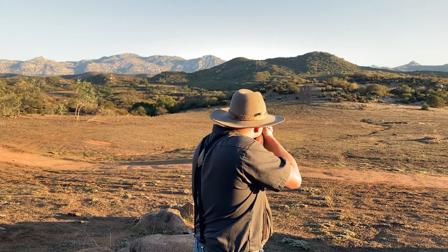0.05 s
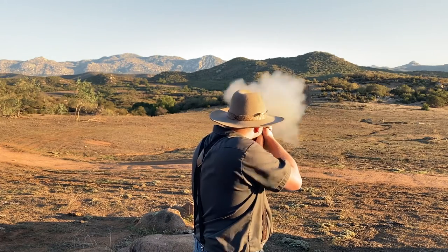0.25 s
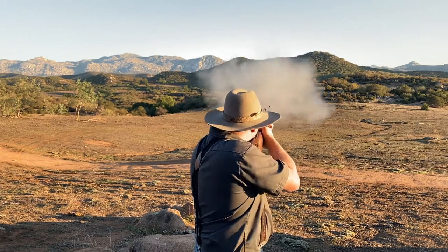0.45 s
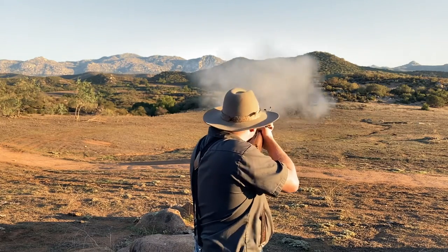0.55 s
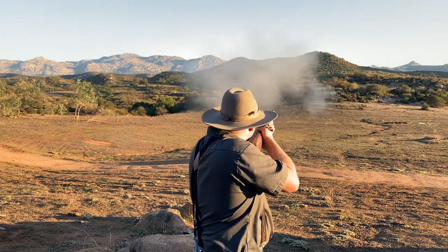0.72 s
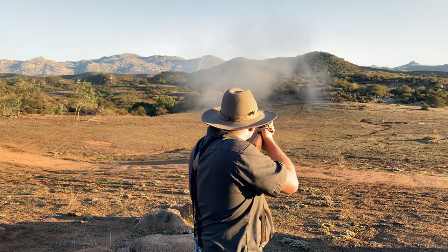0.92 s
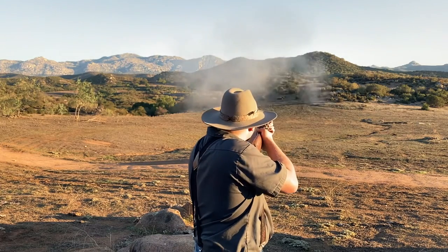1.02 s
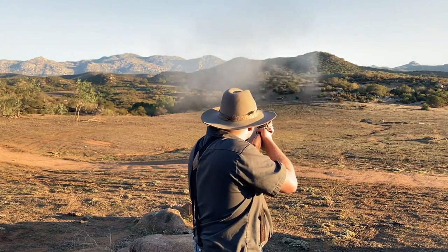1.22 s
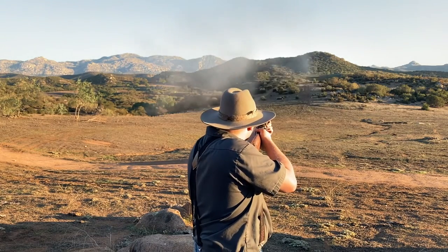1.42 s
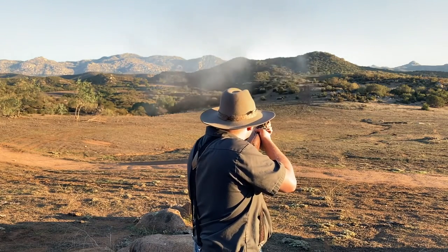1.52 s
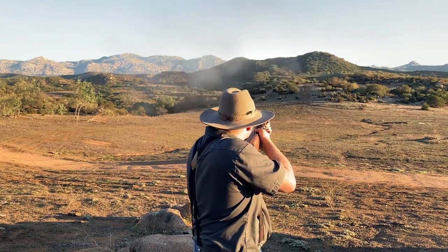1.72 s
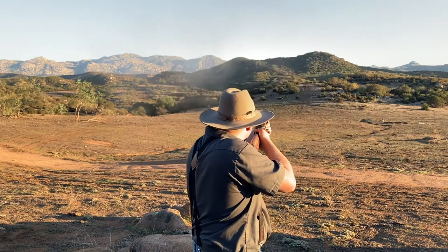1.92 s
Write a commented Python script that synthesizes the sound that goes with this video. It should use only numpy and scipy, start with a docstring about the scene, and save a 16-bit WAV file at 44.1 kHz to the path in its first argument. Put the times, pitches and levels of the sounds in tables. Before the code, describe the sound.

On open dry scrubland, one nearby rifle fires with a sharp, slightly overloaded blast; scattered echoes and low bass waves fade over a second and a half, then a far metal target clinks softly.

```python
"""A rifle shot close by on open scrubland: a faint swell of noise, a blast in several fronts, a deep thump.
Bushes, a slope and far hills send it back ever duller; late, a distant steel plate rings under the bullet.
A low outdoor rumble lies under all. Shaped noise makes the lead-in, fronts, roar, echoes and rumble;
sines that die away make the first tick, the pressure swings, the thump and the notes of the steel."""
import sys
import numpy as np
from scipy import signal
from scipy.fft import rfft, irfft, next_fast_len
from scipy.io import wavfile
from scipy.ndimage import uniform_filter1d, map_coordinates

SR = 44100
rng = np.random.default_rng(int(sys.argv[2]) if len(sys.argv) > 2 else 0)


def attenuation_scalar(level_db):
    """Turn a level in dB into a linear amplitude multiplier (20 dB per decade)."""
    decades = np.asarray(level_db, float) / 20
    return 10 ** decades


def output_pcm(signal):
    """Save a mono or channel-first signal as 16-bit PCM at the path in sys.argv[1].

    Samples are clipped to [-1, 1] before scaling.
    """
    pcm = np.clip(np.atleast_2d(signal).T, -1, 1) * 32767
    wavfile.write(sys.argv[1], SR, np.round(pcm).astype(np.int16))


N = 85995

# In every noise colour below, the levels only matter relative to each other.
# Shock fronts, bursts of bright noise: (t/s, level/dB before doubling, length/s, left over right/dB)
SHOCK_FRONTS = [(.2190, -9, .0012, -2), (.2240, -15, .0015, -1), (.2272, -9, .0025, -2),
                (.2322, -9, .0018, -1), (.2366, -14, .002, 0)]
# How alike left and right are for wide, outdoor sounds: (f/Hz, likeness from 0 to 1)
WIDE = [(50, 0.9), (200, .9), (1000, .7), (4000, .6), (12000, .3)]
# The same for the blast and other short, sharp sounds: (f/Hz, likeness from 0 to 1)
COMPACT = [(50, 1), (1000, .8), (8000, .3), (12000, 0.13)]
LEFT_LEADS_S = .0004  # the left channel of some echoes comes this much earlier


def unit(x):
    """Scales a signal to rms 1."""
    return x / np.sqrt(np.mean(x ** 2) + 1e-20)


def along(points, hz):
    """Reads a curve of (f/Hz, value) points along a log pitch axis."""
    f, v = np.transpose(points)
    return np.interp(np.log(hz + 1), np.log(f + 1), v)


def level(rows):
    """Gain per sample from (t/s, level/dB) rows, practically silent before the first."""
    s, db = np.transpose(rows)
    return attenuation_scalar(np.interp(np.arange(N) / SR, s, db, left=-150))


def pan(db):
    """Left and right gains that differ by db."""
    return attenuation_scalar(np.array([[db / 2], [-db / 2]]))


def fade_in(at_s, over_s):
    """A smooth step from 0 to 1, half way up at at_s."""
    return (1 + np.tanh((np.arange(N) / SR - at_s) / over_s / 2)) / 2


def decay(start_s, t60, rise_s):
    """Seconds since a start, and an envelope that rises, then falls by 60 dB in each t60 seconds."""
    t = np.maximum(np.arange(N) / SR - start_s, 0)
    return t, attenuation_scalar(-60 * t / t60) * (1 - np.exp(-t / rise_s))


def ring(start_s, db, hz, t60, rise_s=1e-4):
    """A sine that dies away, like one freely swinging note."""
    t, shape = decay(start_s, t60, rise_s)
    return attenuation_scalar(db) * shape * np.sin(2 * np.pi * hz * t)


def rush(spectrum, alike, patchy_db=0, air_db=0, power=1, lead_s=0):
    """Coloured stereo noise in patches; air takes air_db per second at 1 kHz, more at higher pitch."""
    hz, t, z = signal.stft(rng.standard_normal((2, N)), SR, nperseg=1024)
    # Random patches, smoothed over pitch and time, are shared by both channels.
    patches = uniform_filter1d(rng.standard_normal(z.shape[1:]), size=8, axis=0)
    patches = unit(uniform_filter1d(patches, size=3, axis=1))
    travel_s = np.maximum(t - SHOCK_FRONTS[0][0], 0)
    lost_db = np.minimum(air_db * (hz[:, None] / 1000) ** power * travel_s, 90)
    pair = signal.istft(z * attenuation_scalar(patchy_db * patches - lost_db), nperseg=1024)[1][:, :N]
    size = next_fast_len(N)
    hz = np.fft.rfftfreq(size, 1 / SR)
    # This angle shares the noise between middle and side to reach the wanted likeness.
    turn = np.arccos(np.clip(along(alike, hz), -1, 1)) / 2
    colour = unit(attenuation_scalar(along(spectrum, hz)))
    mid, side = rfft(pair, size) * colour * [np.cos(turn), np.sin(turn)]
    left = (mid + side) * np.exp(2j * np.pi * hz * lead_s)
    return irfft(np.array([left, mid - side]), size)[:, :N]


def lead_in():
    """A faint noise swells just before the blast, with a short high tick (a dying sine)."""
    # Swell of the noise: (t/s, level/dB)
    lead_in_swell = [(.193, -66), (.199, -33.5), (.206, -25), (.212, -20), (.218, -17), (.222, -38)]
    # Colour of the noise: (f/Hz, relative level per Hz/dB)
    lead_in_colour = [(120, -33), (200, 1), (1600, -4.5), (2300, -5), (4400, -18.5), (7800, -15.5),
                      (8500, -36.5), (9500, -56.5), (16000, -72.5)]
    end_s = lead_in_swell[-1][0]
    cut_off = level([(0, 0), (end_s, 0), (end_s + .004, -120)])
    noise = level(lead_in_swell) * cut_off * rush(lead_in_colour, COMPACT)
    tick = pan(-9.5) * ring(.2062, -10.5, hz=2200, t60=0.009, rise_s=.0002)
    return noise + tick


def shock_fronts():
    """The blast arrives as several sharp pressure fronts, each a very short burst of noise."""
    # Colour of the crack: (f/Hz, relative level per Hz/dB)
    crack_colour = [(880, -30.5), (1500, -4), (1910, -5), (5420, -11.5), (7320, -3.5), (8950, -15.5),
                    (11400, -5.5), (13500, -25), (15100, -20.5), (16500, -37)]
    bursts = 0
    for start_s, db, length_s, left_db in SHOCK_FRONTS:
        shape = decay(start_s, 3 * length_s, length_s / 4)[1]
        bursts = bursts + pan(left_db) * attenuation_scalar(db) * shape
    return 2 * bursts * rush(crack_colour, COMPACT)


def gas_jet():
    """The gas jet swings the pressure; a weak, delayed copy with opposite signs parts left from right."""
    # Pressure swings: (t/s, level/dB, f/Hz, time to fall 60 dB/s, direction +1 or -1)
    swing_rows = [(.21952, 2, 2400, .003, 1), (.2209, -3, 400, .015, -1), (.2245, -8, 1100, .008, -1),
                  (.2288, -4, 900, .01, 1), (.2300, -11, 240, .06, 1), (.2312, -4, 600, .01, 1),
                  (.2330, 2, 1150, .007, -1), (.2341, 2, 450, .017, -1), (.2392, -5, 125, .025, 1)]
    swings = 0
    for start_s, db, hz, t60, direction in swing_rows:
        # Each swing rises with a time constant of 0.16 of a cycle.
        swings = swings + direction * ring(start_s, db, hz, t60, 0.16 / hz)
    # The copy comes 1 ms later and makes left and right differ.
    side_copy = attenuation_scalar(-13) * np.roll(swings, round(.001 * SR)) * [[-1], [1]]
    return swings + side_copy


def gas_cloud(start_s):
    """The gas cloud swells and collapses a few times: a deep sine that fades fast."""
    db, hz, fade_s = -9, 53.34, 0.021
    t = np.maximum(np.arange(N) / SR - start_s, 0)
    shape = np.exp(-(t / fade_s) ** 1.6) * (1 - np.exp(-t / .002))
    return attenuation_scalar(db) * shape * np.sin(2 * np.pi * hz * t)


def thump():
    """The gas cloud's deep pulse, stronger on the right and 1.3 ms later on the left."""
    start_s, left_lags_s = .2360, 0.0013
    return pan(-5.5) * [gas_cloud(start_s + left_lags_s), gas_cloud(start_s)]


def roar():
    """Burning gas and the nearest ground: low noise that dies away."""
    # Colour of the roar: (f/Hz, relative level per Hz/dB)
    roar_colour = [(100, -40.5), (200, -16), (400, -19.5), (600, -23.5), (1600, -28), (5700, -36),
                   (8500, -41.5), (9270, -60), (10800, -36.5), (13000, -46), (13700, -59), (15500, -47),
                   (16500, -80)]
    shape = decay(0.2207, t60=0.12, rise_s=0.0067)[1]
    return attenuation_scalar(-10.5) * shape * rush(roar_colour, COMPACT)


def steel_plate():
    """The bullet smacks the far steel, which rings in many notes; the scrub scatters the smack."""
    # Notes of the steel, some in beating pairs: (f/Hz, level/dB relative to the plate, time to fall 60 dB/s)
    steel_notes = [(1040, -14, 0.61), (1310, -5.5, 0.38), (1330, -14, 0.81), (1318, -3, .07),
                   (1920, -33, 0.18), (2450, -29, 0.18), (3080, -24, .11), (3720, 6.5, 0.1),
                   (3560, -16, 0.18), (4140, -19.5, 0.48), (5100, -26.5, 0.52), (6170, -24.5, 0.37),
                   (6600, -38, 0.27), (7000, -31, 0.4), (7500, -28, 0.3)]
    # Colour of the smack: (f/Hz, relative level per Hz/dB)
    smack_colour = [(180, -41), (300, -17), (923, -10), (1300, -3.5), (3320, -13), (3720, -9),
                    (5020, -23.5), (8150, -28.5), (9000, -56), (11700, -86), (19800, -120)]
    start_s, plate_db, rise_s = 1.7562, -43, .004
    waver_db, waver_per_s = 2.5, 25
    knots = np.arange(N) * waver_per_s / SR

    def waver():
        """The air on the long path makes a note's level wander at random."""
        return attenuation_scalar(waver_db * map_coordinates(rng.standard_normal(200), [knots]))

    def ringing():
        """All notes for one channel."""
        return sum(waver() * ring(start_s, plate_db + db, hz, t60, rise_s) for hz, db, t60 in steel_notes)

    notes = np.array([ringing(), ringing()])
    smack = attenuation_scalar(-33) * decay(start_s, .06, rise_s)[1] * rush(smack_colour, COMPACT)
    scatter = attenuation_scalar(-54) * decay(start_s, .4, 0.0033)[1] * rush(smack_colour, WIDE, patchy_db=7.0)
    return notes + smack + scatter


def scrub_echo():
    """Near bushes scatter the blast back as noise, then the farther slope takes over."""
    # Strength of the echo: (t/s, level/dB before the gains below)
    echo_levels = [(0.25, -37), (0.284, -51), (0.292, -47), (0.304, -63), (0.314, -52), (0.352, -58),
                   (0.366, -51), (0.396, -60), (0.41, -51), (0.466, -52.5), (0.518, -45), (0.608, -52),
                   (0.64, -57), (0.664, -50), (0.682, -55.5), (0.706, -50.5), (0.714, -57), (0.776, -56),
                   (0.854, -65), (0.87, -58.5), (0.93, -60), (0.954, -67), (1.284, -76), (1.3, -71)]
    # Colour of the near bushes: (f/Hz, relative level per Hz/dB)
    bush_colour = [(160, -34.5), (280, -5.5), (470, -11), (1000, -11.5), (2100, -16.5), (4400, -21),
                   (7800, -29), (8600, -33), (9240, -61), (9800, -35), (11500, -32), (13000, -41.5),
                   (13700, -65), (15000, -39), (16000, -48), (16500, -78)]
    # Colour of the farther slope, with its ground dip: (f/Hz, relative level per Hz/dB)
    slope_colour = [(190, -27), (330, -16), (420, -8.5), (600, -3.5), (1100, -15), (2100, -2.5),
                    (3500, -13), (4400, -14), (5900, -26), (7400, -16.5), (8600, -22), (9240, -46),
                    (10500, -27), (12500, -25), (13500, -67)]
    far = fade_in(0.76, 0.077)
    bushes = rush(bush_colour, WIDE, patchy_db=2.13, air_db=0.43, power=1.1, lead_s=LEFT_LEADS_S)
    slope = attenuation_scalar(1.5) * rush(slope_colour, WIDE, patchy_db=2.5, air_db=0.25, power=2.14)
    shape = fade_in(.285, .006) * level(echo_levels)
    return attenuation_scalar(3.5) * shape * ((1 - far) * bushes + far * slope)


def bank_echo():
    """A broad bank answers in one full swell of noise that starts and stops quickly."""
    # Colour of the bank: (f/Hz, relative level per Hz/dB)
    bank_colour = [(200, -30), (350, -2), (700, 0), (1400, -2), (3000, -12), (6000, -24), (8500, -38),
                   (9000, -80)]
    start_s, length_s, edge_s = .52, .105, .008
    shape = fade_in(start_s, 2 * edge_s) * (1 - fade_in(start_s + length_s, edge_s))
    return attenuation_scalar(-45) * shape * rush(bank_colour, WIDE, patchy_db=2.5, lead_s=LEFT_LEADS_S)


def rolling_bass():
    """The echo's bass rolls on in waves; its upper part is lost very fast along the way."""
    # Waves of the roll: (t/s, level/dB)
    roll_levels = [(0.3, -38.5), (0.326, -44), (0.396, -46.5), (0.436, -34.5), (0.47, -43.5),
                   (0.602, -31.5), (0.672, -43.5), (0.722, -35), (0.868, -48), (0.92, -42.5), (1.072, -55),
                   (1.19, -50.5), (1.236, -56.5), (1.282, -40.5), (1.314, -50.5), (1.352, -45), (1.49, -49),
                   (1.558, -41.5), (1.608, -52), (1.844, -52), (1.894, -68.5), (1.95, -48.5)]
    # Colour of the bass: (f/Hz, relative level per Hz/dB)
    bass_colour = [(18, -58), (35, -14), (50, -10.5), (75, -4.5), (110, 2), (150, 2.5), (230, -4.5),
                   (310, -7.5), (420, -12.5), (550, -26), (920, -120)]
    bass = rush(bass_colour, WIDE, patchy_db=2.0, air_db=307, power=2.434, lead_s=LEFT_LEADS_S)
    return level(roll_levels) * bass


def hill_echo():
    """Far hills return the blast late as noise, dulled by the long way through the air."""
    # Strength of the echo: (t/s, level/dB before the 8 dB lift below)
    hill_levels = [(1.1, -76.5), (1.27, -68.5), (1.35, -60.5), (1.43, -67), (1.49, -59.5), (1.56, -62),
                   (1.63, -68.5), (1.74, -57.5), (1.84, -70), (1.9, -83), (1.95, -93)]
    # Colour of the hills: (f/Hz, relative level per Hz/dB)
    hill_colour = [(180, -56), (300, -25), (367, -20), (613, -6.5), (1300, 0), (1940, -3.5), (2720, -32),
                   (3630, -36), (6000, -67.5), (7800, -85), (13200, -120)]
    shape = fade_in(1.15, 0.062) * level(hill_levels)
    return attenuation_scalar(8) * pan(2.518) * shape * rush(hill_colour, WIDE, patchy_db=3.5, air_db=4, power=1.8)


def slap_echo():
    """One short sharp echo: a burst of noise, a little stronger on the right."""
    # Colour of the slap: (f/Hz, relative level per Hz/dB)
    slap_colour = [(250, -25), (380, -1), (700, 0), (1300, -10), (3000, -21), (6000, -40), (8000, -80)]
    shape = decay(1.2505, t60=.04, rise_s=.001)[1]
    return attenuation_scalar(-44) * pan(-3.5) * shape * rush(slap_colour, COMPACT)


def outdoor_rumble():
    """A steady low noise lies under everything."""
    # Colour of the rumble: (f/Hz, relative level per Hz/dB)
    rumble_colour = [(20, -62), (35, -20.5), (58, -6.5), (85, -9.5), (120, -15.5), (200, -32.5),
                     (300, -45.5), (550, -58.5), (2500, -66.5), (4500, -65.5), (8500, -73), (11300, -69.5),
                     (16000, -93.5)]
    return attenuation_scalar(-49.5) * rush(rumble_colour, WIDE, patchy_db=0.5)


def scene():
    """The shot, the steel plate and the echoes over the rumble."""
    shot = lead_in() + shock_fronts() + gas_jet() + thump() + roar()
    echoes = scrub_echo() + bank_echo() + rolling_bass() + hill_echo() + slap_echo()
    return shot + steel_plate() + echoes + outdoor_rumble()


def top_cut(x):
    """Nothing passes above the cut-off."""
    return signal.sosfilt(signal.butter(12, 17000, fs=SR, output="sos"), x)


def record(dry):
    """The input stage rounds the highest peaks so that they stay below full scale."""
    knee = 5  # higher bends later and harder
    rounded = dry / (1 + np.abs(dry) ** knee) ** (1 / knee)
    return top_cut(rounded)


dry = scene()
out = record(dry)
output_pcm(out)
```